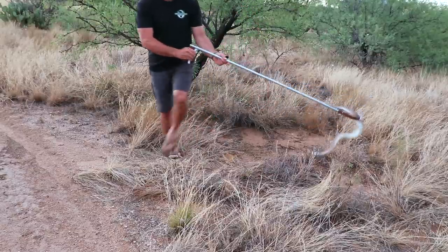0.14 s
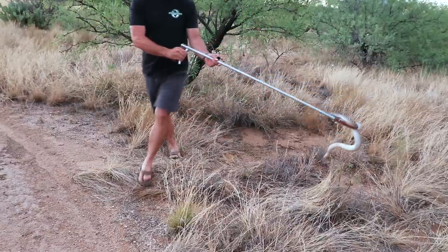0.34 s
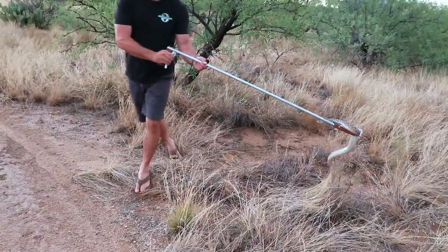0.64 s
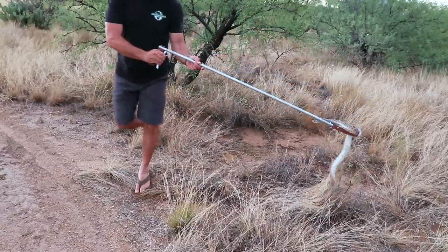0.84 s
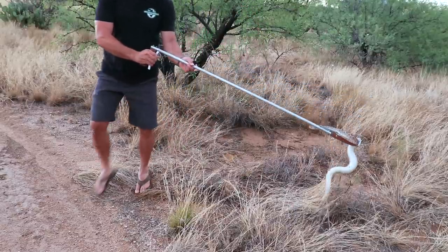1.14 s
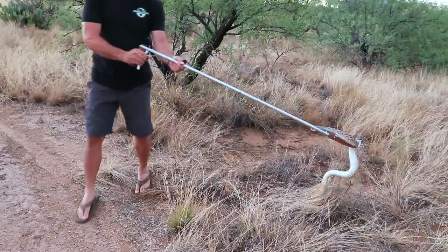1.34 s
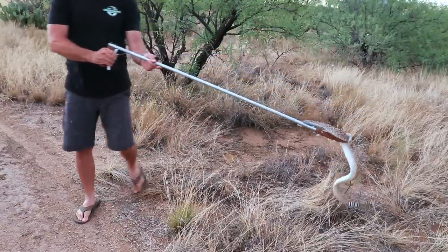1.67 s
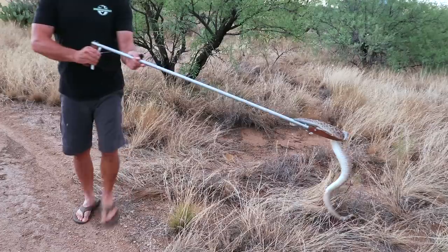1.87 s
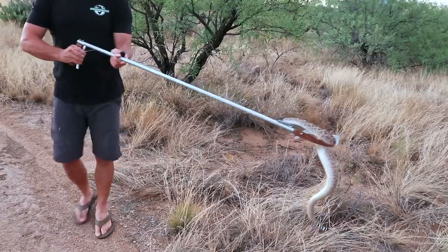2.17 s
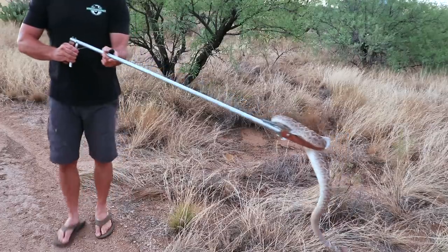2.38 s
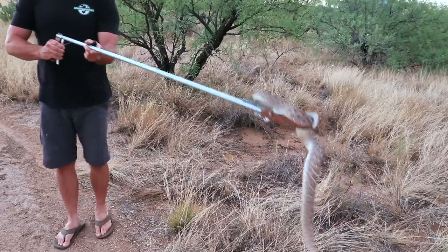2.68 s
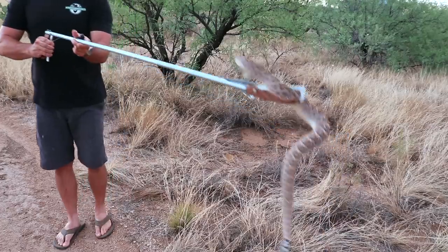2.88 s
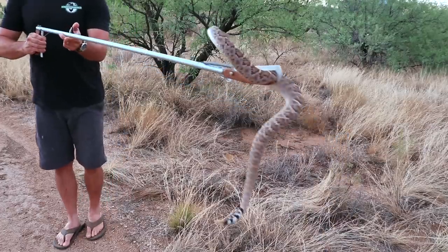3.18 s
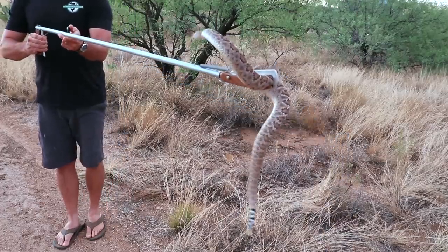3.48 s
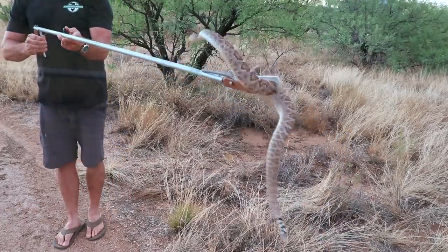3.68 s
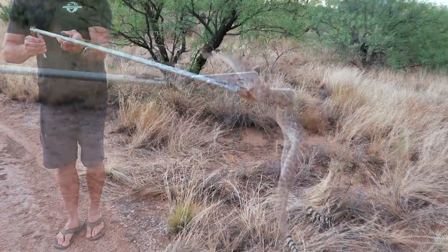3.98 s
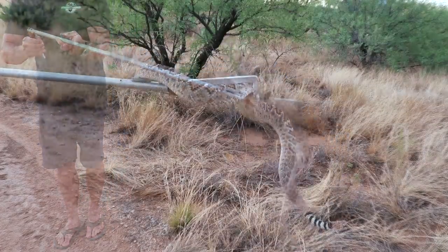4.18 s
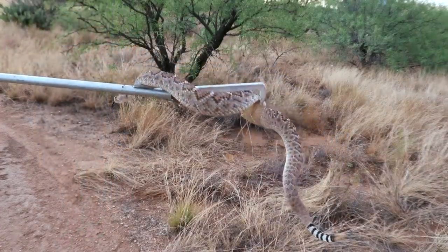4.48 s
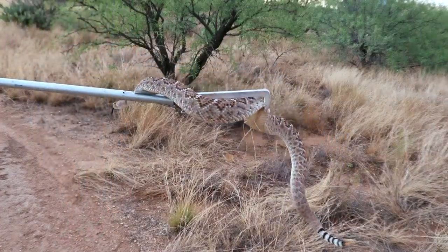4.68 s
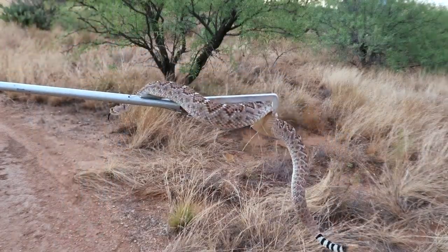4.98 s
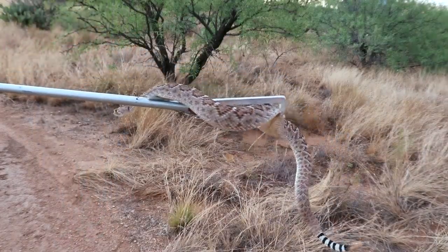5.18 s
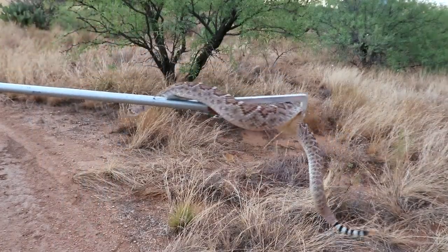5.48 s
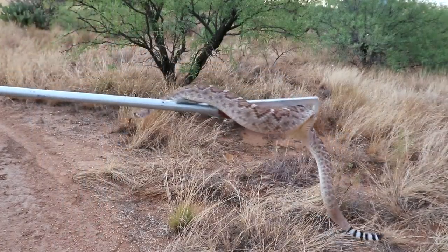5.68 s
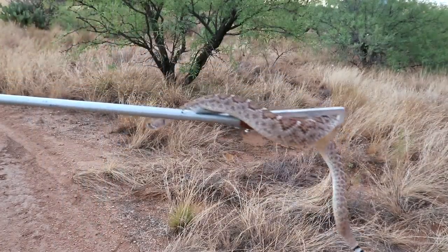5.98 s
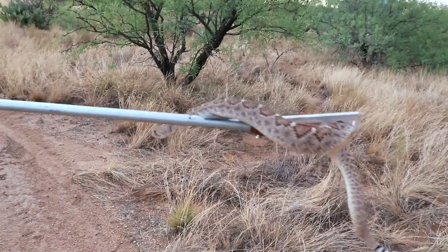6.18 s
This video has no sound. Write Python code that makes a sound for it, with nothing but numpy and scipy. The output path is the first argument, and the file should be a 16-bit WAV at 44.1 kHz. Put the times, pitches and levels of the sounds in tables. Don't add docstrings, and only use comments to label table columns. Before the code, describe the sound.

A rattlesnake's fast, dry, steady buzz sounds close outdoors, then dissolves into a slower, pulsing rattle while footsteps crunch grit and snap dry stalks.

```python
import sys
import numpy as np
from scipy import signal
from scipy.fft import rfft, irfft, next_fast_len
from scipy.io import wavfile
from scipy.ndimage import map_coordinates

SR = 44100
rng = np.random.default_rng(int(sys.argv[2]) if len(sys.argv) > 2 else 0)


def ratio(d):
    e = np.asarray(d, float) / 20
    return 10 ** e


def wav_record(signal):
    frames = np.transpose(np.atleast_2d(signal))
    bounded = np.clip(frames, -1, 1)
    quanta = np.round(bounded * 32767).astype(np.int16)
    wavfile.write(sys.argv[1], SR, quanta)


N = 279153


def unit(x):
    return x / np.sqrt(np.mean(x ** 2) + 1e-20)


def curves(rows):
    s, *cols = np.transpose(rows)
    return [np.interp(np.arange(N) / SR, s, c) for c in cols]


def wobble(rate_hz):
    knots = rng.standard_normal(int(N * rate_hz / SR) + 4)
    return map_coordinates(knots, [np.arange(N) * rate_hz / SR])


def coloured(x, points):
    m = next_fast_len(N + 8192)
    hz, db = np.transpose(points)
    log_hz = np.log(np.fft.rfftfreq(m, 1 / SR) + 1)
    gain = ratio(np.interp(log_hz, np.log(hz + 1), db))
    return irfft(rfft(x, m) * unit(gain), m)[:N]


def clicks(density_hz, scatter_db, build_ms, bed):
    hit = rng.random(N) < density_hz / SR
    power = hit * ratio(2 * scatter_db * rng.standard_normal(N))
    pole = np.exp(-1000 / (build_ms * SR))
    power = signal.lfilter([1], [1, -pole], power[::-1])[::-1]
    power = bed + power / np.mean(power)
    return np.sqrt(power / np.mean(power)) * rng.standard_normal(N)


def shell(strikes, body_gain, body, sheen_gain, sheen):
    return coloured(body_gain * strikes, body) + coloured(sheen_gain * strikes, sheen)


# (time [s], level [dB], sheen over body [dB])
BUZZ = [(0, -22.5, -6.5), (.2, -24, -6.5), (.5, -23, -4.5), (.6, -25, -7), (.75, -23.5, -7.5),
        (.95, -25, -5.5), (1.1, -23, -4.5), (1.4, -22.5, -6), (1.6, -24, -5.5), (1.7, -22, -5),
        (1.95, -19.5, -6), (2.15, -20, -4), (2.8, -19.5, -6), (2.92, -20, -3.5), (3.5, -21, -3.5),
        (3.9, -22, -3)]
# (time [s], rate [Hz], beat depth [0-1])
STRIKES = [(0, 165, 0.2), (.65, 162, 0.42), (1.2, 169, 0.32), (1.55, 157, 0.44), (1.8, 160, 0.33),
           (2.05, 157, 0.44), (2.5, 163, 0.23), (2.9, 157, 0.5), (3.4, 153, 0.5), (4.4, 154, 0.47)]
# (time [s], extra path [ms], strength [0-1])
ECHO = [(0, .96, .7), (.05, 1.12, .6), (.1, 1.25, .45), (.18, 1.37, .3), (.27, 1.25, .35), (.35, .97, .45),
        (.4, .947, .65), (.6, 1.2, .5), (.7, 1.253, .45), (.78, 1.2, .3), (.85, 1.05, .03), (1.4, 1.84, .1),
        (1.5, 2.19, .25), (1.6, 1.68, .3), (1.7, 1.5, .2), (1.9, 1.689, .55), (2.3, 2.194, .55),
        (2.5, 2.585, .02)]
# (time [s], length [ms], dip [dB])
FALTERS = [
    (.783, 10, -3),
    (.826, 26, -5),
    (1.36, 20, -4),
]
# (frequency [Hz], density [dB per Hz])
BODY_FAR = [(410, -47), (700, -40), (728, -59), (908, -32), (1330, -31), (1750, -25), (2180, -21.5),
            (2860, -3.5), (3300, -1.5), (3850, -2.5), (4320, 1), (5290, 1), (7000, -7), (9100, -36),
            (15400, -120)]
# (frequency [Hz], density [dB per Hz])
SHEEN_FAR = [(5500, -65), (6800, -24), (7600, -2.5), (8600, 0.5), (9800, -2.5), (10800, 3.5), (12000, 1.5),
             (13600, 4), (14400, -5), (15800, -7.5)]


def buzz():
    dissolve_s, dissolve_length_s, first_view_db = 3.746, 0.7, 2
    top_edge_hz, top_opens_db_per_db, neutral_sheen_db = 10700, 0.52, -4
    ground_share = 1.2
    t = np.arange(N) / SR
    level_db, sheen_db = curves(BUZZ)
    strikes_hz, depth = curves(STRIKES)
    phase = 2 * np.pi * np.cumsum(strikes_hz + 3 * wobble(29.87)) / SR
    body = 1 + np.clip(depth, 0, 1) * np.cos(phase) + 0.03 * np.cos(phase / 2)
    ramp = -sum(share * np.sin(k * (phase - 2.6)) for k, share in [(1, .9), (2, .4), (3, .15)])
    tip = 1 + np.clip(1.25 * depth, 0, 1) * ramp
    strikes = clicks(3000, scatter_db=-4.0, build_ms=0.35, bed=1.0)
    for s, ms, dip_db in FALTERS:
        level_db = level_db + dip_db * np.exp(-((t - s) * 2000 / ms) ** 4)
    fade = np.clip(1 - (t - dissolve_s) / dissolve_length_s, 0, 1)
    gain = fade * ratio(level_db + first_view_db + 0.68 * wobble(39.92))
    sheen_gain = ratio(sheen_db) * np.sqrt(np.abs(tip))
    direct = gain * shell(strikes, np.sqrt(np.abs(body)), BODY_FAR, sheen_gain, SHEEN_FAR)
    high_pass = signal.butter(4, top_edge_hz, 'high', fs=SR, output='sos')
    top = signal.sosfiltfilt(high_pass, direct)
    direct = direct + (ratio(top_opens_db_per_db * (sheen_db - neutral_sheen_db)) - 1) * top
    path_ms, strength = curves(ECHO)
    dull = signal.lfilter([.55], [1, -.45], direct)
    echo = map_coordinates(dull, [np.arange(N) - path_ms * SR / 1000], order=3)
    return (direct + ground_share * strength * echo) / np.sqrt(1 + strength ** 2)


# (time [s], level [dB])
FLOOR = [(0, -58), (.63, -54), (1.99, -55), (2.5, -60), (3.97, -65), (4.34, -55.5), (6.33, -56.5)]
# (frequency [Hz], density [dB per Hz])
AIR = [(12, -38), (20, 10), (120, 9.5), (175, -16), (238, -18), (301, -25), (354, 8.5), (401, -15),
       (642, -32.5), (1500, -4), (1950, -32), (3300, -120)]
# (frequency [Hz], level over background [dB])
HUM = [(59.2, -7.5), (236.9, -5.5), (296.1, -15), (355.3, -8.5), (473, -26), (590, -8)]


def background():
    t = np.arange(N) / SR
    hum = np.zeros(N)
    for hz, db in HUM:
        line_gain = ratio(db + 2 * wobble(6))
        hum += line_gain * np.sin(2 * np.pi * hz * t + .5 * wobble(8))
    air = ratio(1.5 * wobble(8)) * coloured(rng.standard_normal(N), AIR)
    return ratio(curves(FLOOR)[0]) * (hum + ratio(-9.5) * air)


# (start [s], rise [ms], fade [ms], level [dB], low weight over scuff [dB])
SCUFFS = [(0.454, 13, 29, -30.5, -23), (.58, 51, 130, -43, -26), (1.0, 60, 98, -54, -24),
          (1.5, 31, 90, -48, -16), (2.029, 33, 15.5, -21.5, -13), (2.09, 36, 35, -34.5, -43),
          (2.48, 33, 120, -42, -29), (2.7, 18, 46, -49, -28), (3.189, 44, 47, -39.5, -16),
          (3.32, 22, 84, -46, -32), (3.54, 12, 60, -53, -23), (4.21, 89, 60, -39, -22),
          (4.78, 46, 110, -65, -20), (5.08, 24, 36, -69, -23), (5.42, 43, 110, -48, -27),
          (5.753, 11, 85, -33, -25), (5.82, 19.2, 45, -28.5, -16), (5.88, 29, 60, -44, -32),
          (6.03, 83, 30, -39, -28), (6.233, 42, 36, -25.5, -22)]
# (time [s], peak [dB])
TICKS = [(0.447, -31), (0.506, -28), (0.71, -29), (0.736, -30), (1.102, -33), (1.578, -31), (1.612, -32),
         (1.772, -31), (2.097, -24), (2.131, -24), (2.489, -30), (2.77, -29), (3.217, -31), (3.247, -31),
         (3.55, -36), (3.605, -37), (4.223, -33), (4.259, -30), (4.437, -33), (5.453, -34), (5.757, -26),
         (5.858, -23), (5.888, -27), (5.909, -26), (6.091, -27), (6.236, -27), (6.297, -19)]


def twigs():
    over_scuff_db, scatter_db, centre_hz = 3, 2.5, 1250
    start, rise_ms, fade_ms, db, _ = np.repeat(SCUFFS, 3, axis=0).T
    when = rng.random(len(start))
    s = np.minimum(start + when * (rise_ms + fade_ms) / 1000, N / SR - .01)
    db = db + over_scuff_db + scatter_db * rng.standard_normal(len(s))
    s, db = np.hstack([[s, db], np.transpose(TICKS)])
    hz = centre_hz * ratio(1.6 * rng.standard_normal(len(s)))
    return list(zip(s, db, hz))


# (time [s], stirring [dB])
RUSTLE = [(0.0, -42), (0.74, -46.5), (1.36, -51), (1.69, -41.5), (2.54, -42.5), (3.89, -64), (4.3, -54),
          (5.57, -50), (5.99, -46.5), (6.33, -58)]
# (time [s], peak [dB], centre [Hz])
SNAPS = [(0.476, -24, 1060), (0.496, -28, 1050), (0.648, -26, 1270), (0.676, -27, 1330), (0.797, -21, 1430),
         (1.428, -24, 1320), (1.714, -27, 1240), (1.771, -25, 520), (2.033, -22, 1340), (2.056, -16, 990),
         (2.07, -14, 910), (2.077, -15, 990), (2.108, -22, 1090), (2.144, -20, 1320), (2.52, -20, 830),
         (2.531, -14, 1180), (2.582, -26, 980), (2.737, -26, 1400), (2.901, -26, 1310), (3.347, -28, 1030),
         (3.369, -28, 1180), (4.278, -26, 1160), (5.765, -23, 1330), (5.846, -21, 1210), (5.947, -23, 1260),
         (6.04, -20, 1370), (6.112, -22, 980), (6.263, -13, 1140), (6.274, -14, 1110), (6.288, -16, 1170)]
# (frequency [Hz], density [dB per Hz])
GRIT = [(250, -32), (460, -14), (640, -5), (850, -1), (1340, 0), (1900, -6), (2600, -10), (5000, -24),
        (12000, -50)]
# (frequency [Hz], density [dB per Hz])
WEIGHT = [(60, -51), (130, 6.5), (250, 5.5), (450, 5.5), (700, -9), (1200, -55)]


def feet():
    rustle_db, weight_db, weight_follows = -3.5, -64.5, 0.22
    stir_db, = curves(RUSTLE)
    grit = ratio(stir_db + rustle_db)
    ducking_db = curves(FLOOR)[0] - FLOOR[0][1]
    weight = ratio(weight_db + weight_follows * (stir_db - stir_db.mean()) + ducking_db)
    for s, rise_ms, fade_ms, db, low_db in SCUFFS:
        since_ms = 1000 * (np.arange(N) / SR - s)
        fade = np.exp(-np.clip(since_ms - rise_ms, 0, None) / fade_ms)
        push = ratio(db) * np.clip(since_ms / rise_ms, 0, 1) * fade
        grit = grit + push
        weight = weight + ratio(low_db) * push
    grains = clicks(450 * ratio(3 * wobble(25)), scatter_db=3.3, build_ms=1.0, bed=.25)
    out = coloured(grit * grains, GRIT) + coloured(weight * grains, WEIGHT)
    t = np.arange(-200, 200) / SR
    for s, db, hz in [*SNAPS, *twigs()]:
        snap = np.sin(2 * np.pi * 1.1 * hz * t + 2.9) * np.exp(-(t * hz / .56) ** 2)
        out[round(s * SR) - 200:][:len(t)] += ratio(db + 5) * snap
    return out


# (time [s], swing [dB], chatter between swings [dB])
SLOW = [(4, -24.5, -27.5), (4.3, -19, -29), (4.5, -20.5, -20), (4.7, -16, -27), (5, -16.8, -25.5),
        (5.3, -16, -30), (5.55, -17, -26.5), (5.8, -18, -30), (6.05, -18, -26.5), (6.33, -17.5, -35.5)]
# (time [s], swings [Hz])
PACE = [(4.0, 19.1), (4.2, 27.96), (4.35, 24.73), (4.45, 23.58), (4.55, 23.8), (4.65, 21.25), (4.75, 26.73),
        (5.0, 25.92), (5.3, 25.41), (5.6, 25.0), (5.9, 24.85), (6.33, 26.85)]
# (time [s], extra length [ms])
DRAGS = [
    (4.3, 13),
    (4.335, 4.6),
    (4.375, 7.5),
    (4.425, 13),
    (4.59, 7.7),
    (4.63, 13),
    (5.46, 5.6),
    (5.495, 9),
    (6.015, 16),
    (6.17, 3.4),
]


def swings():
    swing_ms, scatter_ms, lead_ms, scatter_db = 20.5, 2, -.5, .7
    drag_db_per_ms = 0.18
    start_turns = .67
    t = np.arange(N) / SR
    turns = start_turns + np.cumsum(curves(PACE)[0] * (t >= PACE[0][0])) / SR
    beats = np.interp(np.arange(1, turns[-1]), turns, t)
    chance = rng.standard_normal((len(beats), 3))
    extra_ms = np.zeros(len(beats))
    for s, ms in DRAGS:
        extra_ms[np.argmin(np.abs(beats - s))] = ms
    ms = np.clip(swing_ms + extra_ms + scatter_ms * chance[:, 0], 8, 45)
    db = np.interp(beats * SR, np.arange(N), curves(SLOW)[0])
    db = db + scatter_db * chance[:, 1] - drag_db_per_ms * extra_ms
    start_s = beats - (ms / 2 + lead_ms + .8 * chance[:, 2]) / 1000
    return zip(start_s, ms, db)


# (frequency [Hz], density [dB per Hz])
BODY_NEAR = [(410, -42), (700, -31), (1110, -24.5), (1270, -22.5), (1570, -26.5), (2160, -23.5), (2800, -3),
             (3060, 0.5), (3500, -4.5), (4240, 1.5), (4850, -1), (5340, 2), (7000, -10.5), (9100, -21.5),
             (15400, -120)]
# (frequency [Hz], density [dB per Hz])
SHEEN_NEAR = [(5500, -33), (6800, 5), (7400, -6.5), (8200, 2), (8800, -1.5), (10900, 5), (13300, 2),
              (14200, 0), (15800, -16)]


def slow_rattle():
    rise_ms, stop_ms, settle_ms, settle_db = 9, .6, 10, -8
    hush_lead_ms, hush_half_width_ms, hush_share = 7, 4, .55
    sheen_start_db, dulling_db_per_s, chatter_sheen = -5, 2, .5
    t = np.arange(N) / SR
    chatter_db = curves(SLOW)[1]
    sheen_db = sheen_start_db - dulling_db_per_s * (t - 4)
    swing = np.zeros(N)
    chatter = ratio(2 * chatter_db + 0.64 * wobble(54)) * (t > 3.8)
    for s, ms, db in swings():
        near = slice(round((s - .02) * SR), round((s + .12) * SR))
        since_ms = 1000 * (t[near] - s)
        after_ms = np.clip(since_ms - ms + 1.2, 0, None)
        rise = np.clip(since_ms / rise_ms + .5, 0, 1)
        ends = 1 + .25 * np.cos(2 * np.pi * (since_ms * 1.6 / ms - 1.25)) + .3 * (since_ms / ms - .5)
        stop = np.exp(-after_ms / stop_ms)
        swing[near] += ratio(2 * (db - 1.6)) * rise * stop * np.clip(ends, 0, 2)
        hush = np.exp(-((since_ms + hush_lead_ms) / hush_half_width_ms) ** 2)
        chatter[near] *= 1 - hush_share * rng.random() ** .5 * hush
        chatter[near] += ratio(2 * (db + settle_db)) * (after_ms > 0) * np.exp(-after_ms / settle_ms)
    flutter_hz = 72 + 2.4 * t + 2 * wobble(10)
    flutter = 1 + .32 * np.cos(2 * np.pi * np.cumsum(flutter_hz) / SR)
    strikes = clicks(2700, scatter_db=2.1, build_ms=.4, bed=.5) * np.sqrt(np.abs(flutter))
    sheen_gain = ratio(sheen_db) * np.sqrt(swing + chatter_sheen * chatter)
    return shell(strikes, np.sqrt(swing + chatter), BODY_NEAR, sheen_gain, SHEEN_NEAR)


def scene():
    return (buzz() + slow_rattle() + feet() + background())[None]


def band_limit(x):
    return signal.sosfilt(signal.butter(12, 16320, fs=SR, output="sos"), x)


def record(dry):
    top_hz = 15830
    soft = dry / (1 + np.abs(dry / .75) ** 4) ** (1 / 4)
    m = next_fast_len(N + 8192)
    passed = np.fft.rfftfreq(m, 1 / SR) < top_hz
    band = irfft(rfft(soft, m) * passed, m)[..., :N]
    return band_limit(band)


dry = scene()
out = record(dry)
wav_record(out)
```